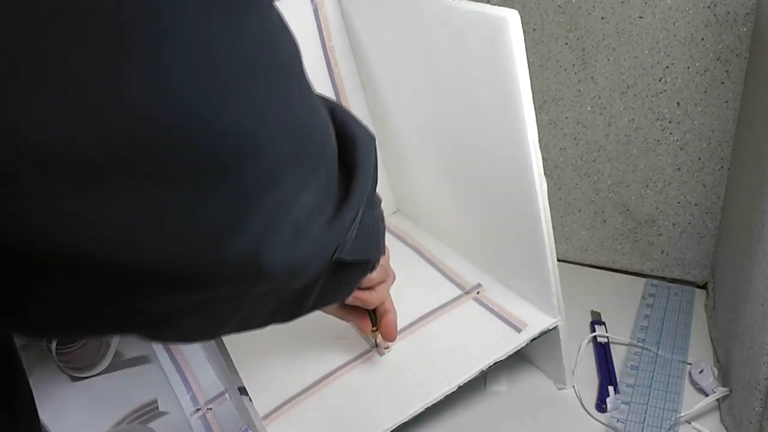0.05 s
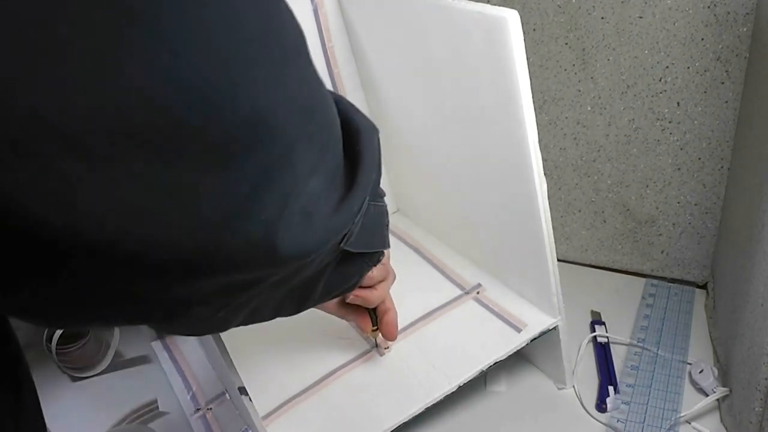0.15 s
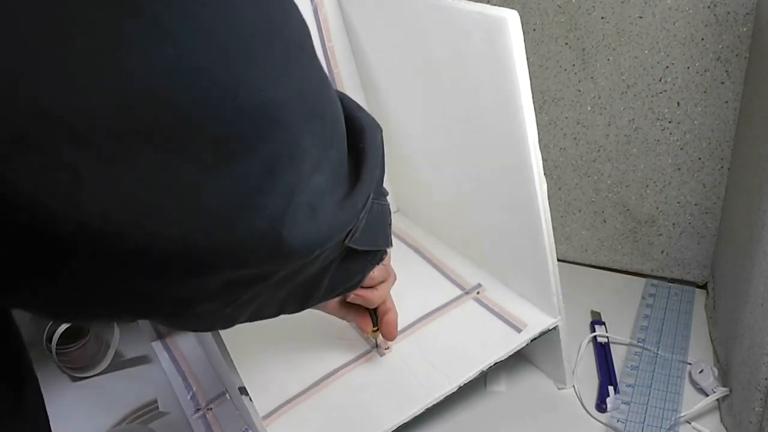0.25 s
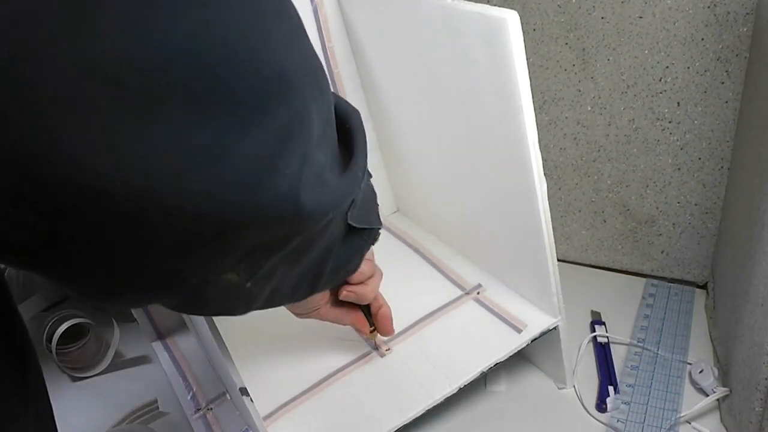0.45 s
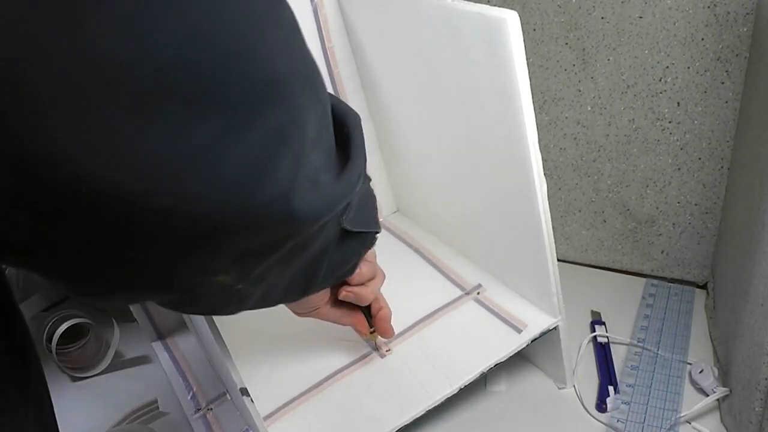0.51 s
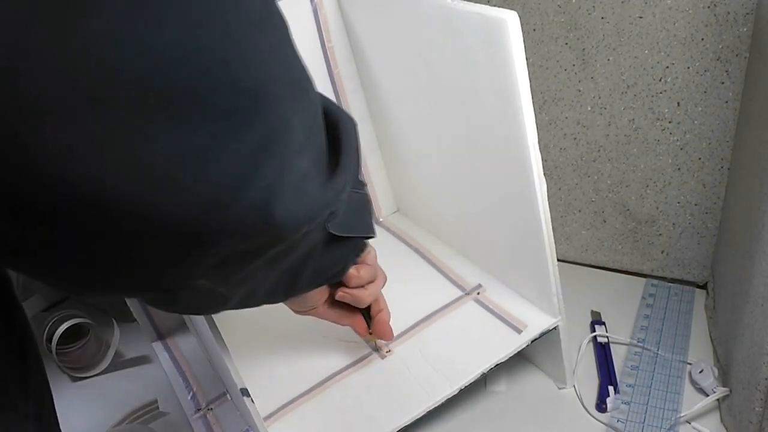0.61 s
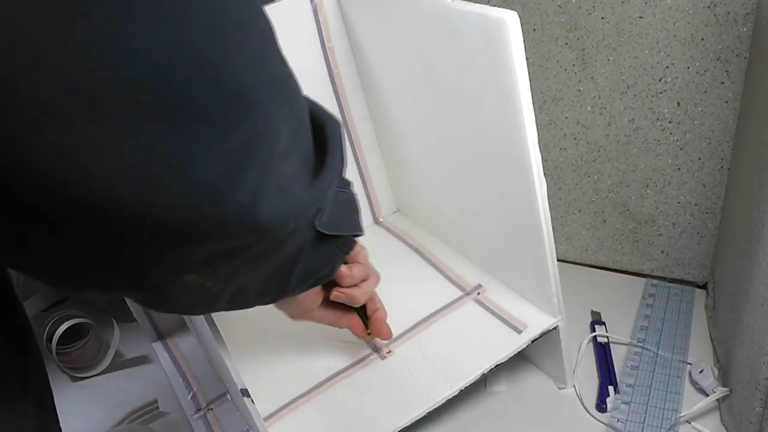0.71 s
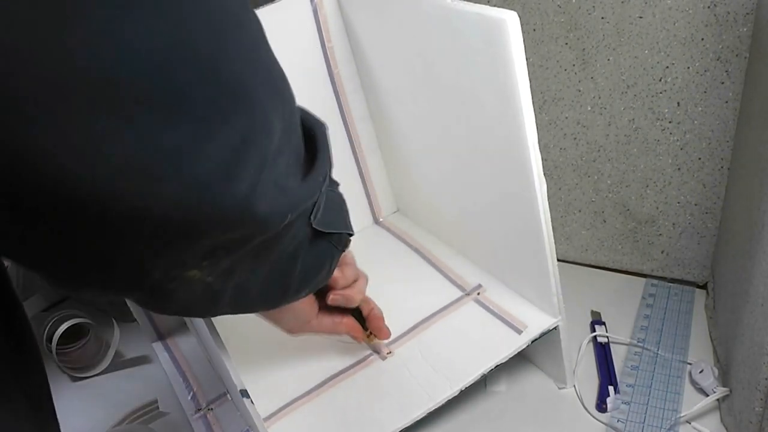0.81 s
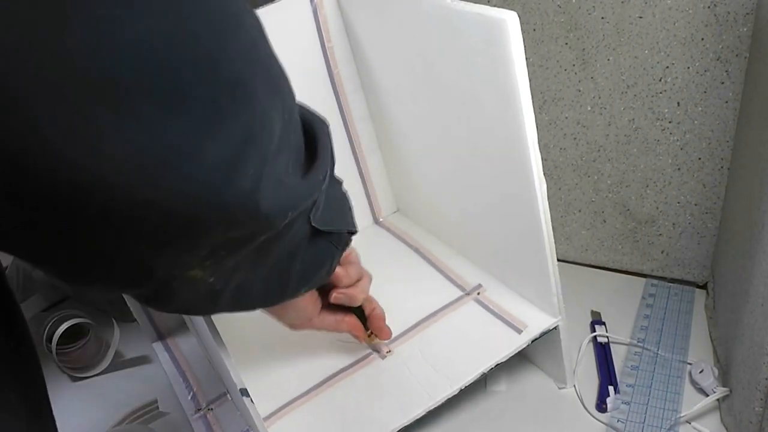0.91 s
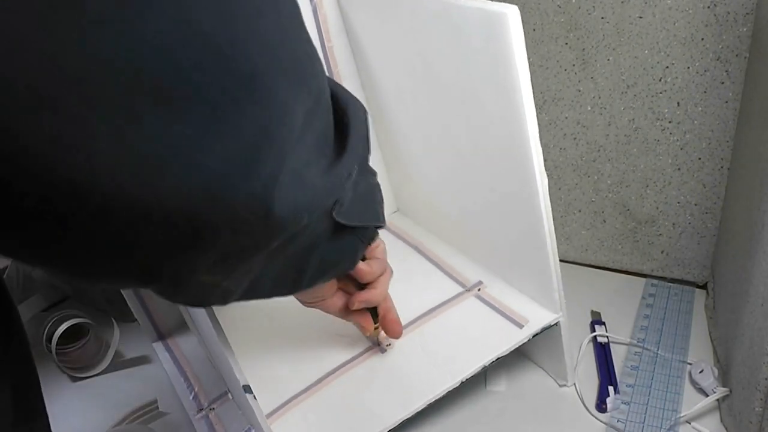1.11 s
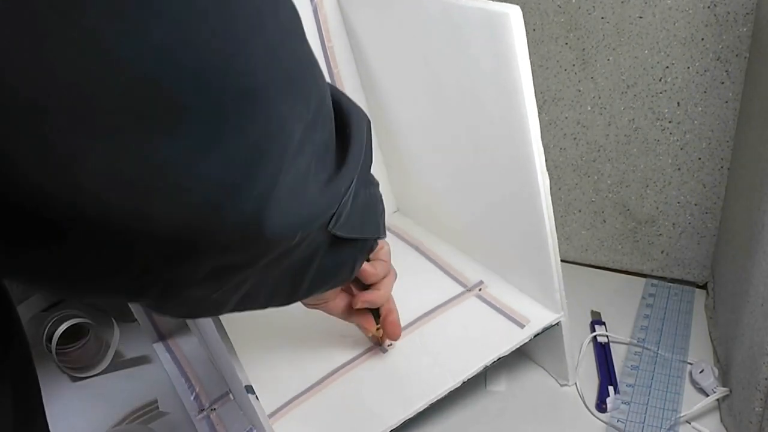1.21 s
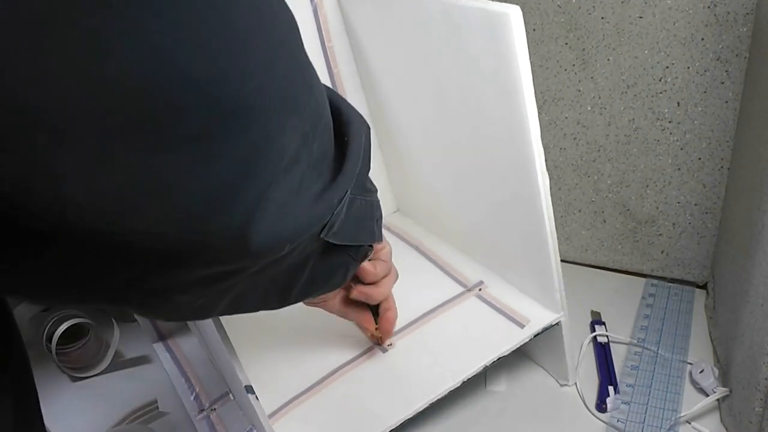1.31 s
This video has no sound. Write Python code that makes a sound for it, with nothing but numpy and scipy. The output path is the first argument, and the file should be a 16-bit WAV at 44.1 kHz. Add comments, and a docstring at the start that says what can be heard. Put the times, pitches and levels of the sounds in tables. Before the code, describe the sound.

A craft knife cuts a foam-core box on a table, close to the microphone: a juddering rasp, light bumps, a second stroke and sharp snap, then a slow pull ending in another snap, in a small hard room.

```python
"""A craft knife is drawn in short strokes through a foam-core box on a table, close to the microphone.
Hand and sleeve rub over a deep rumble as the first stroke rasps and judders, with brief chatters of the board.
Light bumps lead into a second stroke and a sharp snap at 0.36 s, where the blade breaks through.
A slow, deep pull with small pops and bumps ends in a second snap at 0.9 s, then a faint rasp eases off.
A small hard room rings after each sound; the loudest peaks overload."""
import sys
import numpy as np
from scipy import signal
from scipy.fft import rfft, irfft
from scipy.io import wavfile
from scipy.ndimage import uniform_filter1d

SR = 44100
rng = np.random.default_rng(int(sys.argv[2]) if len(sys.argv) > 2 else 0)


def persist_wave(psi):
    """Save psi, clipped to +-1, as 16-bit WAV."""
    counts = np.round(np.clip(psi, -1, 1) * 32767).astype(np.int16)
    wavfile.write(sys.argv[1], SR, np.atleast_2d(counts).T)


N = 59535  # samples, 1.35 s


def amp(db):
    """Decibels to gain."""
    return 10 ** (np.asarray(db) / 20)


def unit(x):
    """Scale to rms 1."""
    return x / np.sqrt(np.mean(x ** 2))


def curve(rows):
    """Gain over time from (seconds, dB) points; practically silent outside them."""
    seconds, db = np.array(rows).T
    return amp(np.interp(np.arange(N) / SR, seconds, db, left=-150, right=-150))


def colour(x, points):
    """Causal minimum-phase filter of unit power, shaped through (Hz, dB) points."""
    hz, db = np.array(points).T
    log_hz = np.log(np.fft.rfftfreq(2 * N, 1 / SR) + 1)
    gain = unit(amp(np.interp(log_hz, np.log(hz), db)))
    # fold the cepstrum forward in time so that nothing sounds early
    cepstrum = irfft(np.log(gain))
    cepstrum[1:N] *= 2
    cepstrum[N + 1:] = 0
    response = np.exp(rfft(cepstrum))
    return irfft(rfft(x, 2 * N) * response)[..., :N]


def stereo(mid, side=0, pan_db=0):
    """Left and right from mid and side; a positive pan leans left."""
    left = (mid + side) * amp(pan_db / 2)
    right = (mid - side) * amp(-pan_db / 2)
    return np.array([left, right])


def flutter(rate_hz, depth_db):
    """Smooth random unevenness of a gain."""
    size = max(int(SR / rate_hz), 1)
    smooth = uniform_filter1d(uniform_filter1d(rng.standard_normal(N), size), size)
    return amp(depth_db * unit(smooth))


def swell(at, length_s):
    """A smooth hump of height 1, its length taken between the 1/e points."""
    return np.exp(-(2 * (np.arange(N) / SR - at) / length_s) ** 2)


GRAINS_PER_S = 4600


def grains(spread_db):
    """Dense tiny clicks of random sign and uneven size, rms 1."""
    hit = rng.random(N) < GRAINS_PER_S / SR
    sign = rng.choice([-1, 1], N)
    size = amp(spread_db * np.clip(rng.standard_normal(N), -2, 2))
    return unit(hit * sign * size)


# Still air. Each row: frequency in Hz, relative density in dB per Hz.
AIR_SPECTRUM = [(25, -11), (60, -12.5), (110, -6.5), (400, 12.5), (1000, -4.5), (3000, -23.5),
                (15000, -31.5)]
AIR_DB = -55.5


def air():
    """Still air: steady, coloured noise with a little width."""
    mid, side = amp(AIR_DB) * colour(rng.standard_normal((2, N)), AIR_SPECTRUM)
    return stereo(mid, 0.22 * side, BOARD_PAN_DB)


# Dull rub of hand and sleeve on the box. Each row: time in seconds, level in dB.
RUB_LEVEL = [(0, -50), (.06, -46), (.13, -56), (.2, -61), (.29, -49), (.36, -30), (.42, -46), (.49, -54.5),
             (.56, -56), (.66, -53), (.74, -52.5), (.85, -52.5), (.95, -69.5), (1.1, -78), (1.35, -56)]
# Tone of that rub. Each row: frequency in Hz, relative density in dB per Hz.
RUB_SPECTRUM = [(25, -27), (60, -23), (100, -9.5), (170, 0), (220, 5.5), (320, -11), (700, -46),
                (2000, -54)]
# Deep rumble. Each row: time in seconds, level in dB.
RUMBLE_LEVEL = [(0, -55), (.25, -53), (.33, -59), (.39, -81), (.6, -76.5), (.66, -59.5), (.86, -57),
                (.95, -64.5), (1.15, -78.5), (1.3, -63), (1.35, -69)]
# Tone of the rumble. Each row: frequency in Hz, relative density in dB per Hz.
RUMBLE_SPECTRUM = [(15, -3.5), (35, -11), (58, -1.5), (90, 0.5), (160, -20), (600, -57.5)]
BOARD_PAN_DB = -1.5  # slightly right, for the board and all around it


def handling():
    """Hand and sleeve rub on the box, over a deep rumble: two layers of coloured noise."""
    rub_noise, rumble_noise = rng.standard_normal((2, N))
    rub = curve(RUB_LEVEL) * colour(rub_noise, RUB_SPECTRUM)
    rumble = curve(RUMBLE_LEVEL) * colour(rumble_noise, RUMBLE_SPECTRUM)
    return stereo(rub + rumble, pan_db=BOARD_PAN_DB)


# Drag of the blade that shakes the panel. Each row: time in seconds, level in dB.
DRAG_LEVEL = [(0, -54.5), (.028, -43), (.062, -37.5), (.09, -31.5), (.106, -54), (.205, -58.5),
              (.222, -31.5), (.238, -24.5), (.26, -38.5), (.3, -43.5), (.33, -36), (.36, -44.5), (.41, -89),
              (.535, -56), (.625, -51.5), (.638, -36.5), (.67, -50), (.75, -43.5), (.79, -54), (.88, -46),
              (.93, -48), (1.1, -68), (1.175, -52.5), (1.22, -80.5), (1.31, -59), (1.35, -65)]
# Tone of the shaken board. Each row: frequency in Hz, relative density in dB per Hz.
JUDDER_SPECTRUM = [(40, -56.5), (120, -30), (220, -11), (310, 0.5), (450, 2), (620, 0.5), (780, -6),
                   (1200, -5.5), (1750, -12), (2600, -26), (5000, -41)]


def judder():
    """The blade sticks and slips: uneven random clicks shake the board."""
    slips = curve(DRAG_LEVEL) * grains(spread_db=4)
    return stereo(colour(slips, JUDDER_SPECTRUM), pan_db=BOARD_PAN_DB)


# Pace of the knife, heard as the level of its rasp, in five passages in order of time.
# Each row: time in seconds, level in dB.
FIRST_STROKE = [(0, -61), (.014, -44.5), (.03, -36), (.058, -42), (.066, -53.5), (.088, -52.5), (.114, -62),
                (.205, -62.5)]
SECOND_STROKE = [(0.204, -66), (0.212, -45.5), (.226, -52), (.236, -37.5), (0.259, -52.5), (.3, -45),
                 (.326, -40), (.358, -52.5), (.37, -85)]
SLOW_PULL = [(.51, -71), (.56, -64.5), (.63, -55.5), (0.692, -53.5), (0.747, -50), (.78, -60.5),
             (.88, -60.5), (.9, -74.5)]
CUT_END = [(.68, -80), (.74, -67.5), (.79, -60), (.87, -62.5), (.894, -41.5), (.905, -78)]
EASING_OFF = [(1.0, -87), (1.051, -69.5), (1.096, -75.5), (1.124, -67.5), (1.184, -70), (1.222, -79.5),
              (1.28, -69.5), (1.35, -74.5)]
# Single foam cells popping. Each row: time in seconds, level before colouring in dB.
POPS = [(0.5627, -44.5), (.758, -49), (0.775, -51), (0.823, -43.5), (0.856, -48.5), (.981, -56),
        (1.149, -50), (1.181, -54.5), (1.193, -55.5), (1.286, -59)]
# Tone of the two quick strokes. Each row: frequency in Hz, relative density in dB per Hz.
QUICK_SPECTRUM = [(300, -22), (1500, 3.5), (2700, -9.5), (3150, -1.5), (3600, -5), (5700, -4.5), (6500, 2),
                  (7100, 1), (7600, 1.5), (8500, 1), (10500, -6.5), (12500, -9.5), (15500, -14.5)]
# The slow, deep pull sings in narrow bands. Each row: frequency in Hz, relative density in dB per Hz.
SLOW_SPECTRUM = [(300, -18.5), (1800, 4.5), (2900, -9), (3400, -5), (3800, 1.5), (4200, -5), (4700, -8),
                 (5300, 2.5), (5800, -16.5), (6400, 2), (6800, -6), (7150, 2.5), (7500, -2.5), (8800, -5.5),
                 (10500, -11), (15500, -19.5)]
# Thin and gritty near the end of the cut. Each row: frequency in Hz, relative density in dB per Hz.
THIN_SPECTRUM = [(300, -14), (3000, -8.5), (5500, -6.5), (7500, -1), (10000, -3.5), (13000, -6.5),
                 (15500, -6)]
# Stereo width of the rasp. Each row: frequency in Hz, relative gain of the side signal in dB.
RASP_WIDTH = [(1500, -0.5), (4000, -1.5), (8000, -3.5), (11500, 6), (16000, -12)]
RASP_SIDE, RASP_PAN_DB = 0.45, 1
POP_S = 0.00041


def rasp():
    """Foam cells tear at the blade's edge as dense clicks, a few popping on their own."""
    quick = (curve(FIRST_STROKE) + curve(SECOND_STROKE)) * flutter(rate_hz=300, depth_db=0.4)
    slow = curve(SLOW_PULL)
    thin = (curve(CUT_END) + curve(EASING_OFF)) * flutter(rate_hz=320, depth_db=3.0)
    pops = sum(amp(db) * swell(at, POP_S) for at, db in POPS)

    def tearing():
        """One independent layer of torn cells under the shared pace."""
        quick_tear = colour(quick * grains(spread_db=0), QUICK_SPECTRUM)
        slow_tear = colour(slow * grains(spread_db=2.5), SLOW_SPECTRUM)
        thin_cells = thin * grains(spread_db=-3.5) + pops * rng.standard_normal(N)
        return quick_tear + slow_tear + colour(thin_cells, THIN_SPECTRUM)

    mid, side = tearing(), tearing()
    return stereo(mid, RASP_SIDE * colour(side, RASP_WIDTH), RASP_PAN_DB)


# Short chatters of the blade. Each row: centre in seconds, length in seconds, typical slip rate in Hz,
# level in dB.
CHATTERS = [(0.032, 0.027, 445, -30.5), (0.037, 0.037, 625, -33.5), (0.086, 0.11, 437, -43.5)]


def chatter(wander_db=-0.22):
    """For a moment the blade slips regularly and the board gives a wavering note."""
    notes = 0
    for at, length_s, slip_hz, db in CHATTERS:
        wavering_hz = slip_hz * flutter(rate_hz=440, depth_db=wander_db)  # about 2.6 % either way
        tone = np.sin(2 * np.pi * np.cumsum(wavering_hz) / SR)
        notes = notes + amp(db) * swell(at, length_s) * tone
    return stereo(notes, pan_db=BOARD_PAN_DB)


def contact(at, length_s):
    """A brief push of area 1; the longer it lasts, the less treble it excites."""
    force = swell(at, length_s)
    return force / force.sum()


def ring(force, modes):
    """Damped modes, each a decaying cosine, ring to a force."""
    t = np.arange(N // 2) / SR
    response = 0
    for hz, db, t60 in modes:
        response = response + amp(db) * np.cos(2 * np.pi * hz * t) * np.exp(-np.log(1000) * t / t60)
    return signal.fftconvolve(force, response)[:N]


SWING_GLIDE_S, SWING_RISE_S, SWING_HOLD_S = 0.0013, 0.0004, 0.0054


def swing(at, start_hz, end_hz):
    """A bending wave crosses the board: its highs arrive first, then a few slow cycles."""
    t = np.maximum(np.arange(N) / SR - at, 0)
    glide = (start_hz - end_hz) * SWING_GLIDE_S * (1 - np.exp(-t / SWING_GLIDE_S))
    turns = end_hz * t + glide
    envelope = (1 - np.exp(-t / SWING_RISE_S)) * np.exp(-(t / SWING_HOLD_S) ** 3)
    return np.sin(2 * np.pi * turns) * envelope


# Modes of the box panel. Each row: frequency in Hz, relative level in dB, time to fall 60 dB in seconds.
PANEL_MODES = [(214.2, -42, 0.26), (282.3, -29, 0.24), (312.2, -21, 0.14), (364, -28.5, 0.24),
               (429, -20.5, 0.074), (495, -57.5, 0.16), (563.4, -25, 0.082), (622, -21.5, .07),
               (689.4, -27.5, 0.12), (794, -19.5, 0.05), (886.5, -15.5, 0.064), (968, -25.5, .09),
               (1182, -20, 0.027), (1358, -13.5, 0.025), (1631, -15, 0.056)]
# Soft bumps of blade and hand on the board. Each row: time in seconds, panel ring in dB,
# contact length in seconds, final swing frequency in Hz, swing level in dB.
BUMPS = [(0.2268, -19, 0.001, 344, -28), (0.233, -18.5, 0.0021, 323, -23),
         (0.2379, -14.5, 0.00061, 585, -26.5), (0.2418, -10.5, 0.001, 307, -20.5),
         (0.5318, -23, .0008, 405, -44), (0.6342, -19.5, 0.00028, 372, -28.5),
         (1.2862, -23, 0.00094, 301, -37.5)]
BUMP_GLIDE = 1.61  # the swing starts this many times higher


def bumps():
    """Soft contacts swing the board and ring its panel, the longer ones mostly its lower modes."""
    force = swings = 0
    for at, ring_db, contact_s, swing_hz, swing_db in BUMPS:
        force = force + amp(ring_db) * contact(at, contact_s)
        swings = swings + amp(swing_db) * swing(at, BUMP_GLIDE * swing_hz, swing_hz)
    return stereo(ring(force, PANEL_MODES) + swings, pan_db=BOARD_PAN_DB)


BOX_ECHO_DB, BOX_ECHO_T60_S = -15, 0.014


def box_echo(x):
    """Sound scatters briefly between the walls of the box: a short decaying noise tail."""
    t = np.arange(N // 8) / SR
    scatter = rng.standard_normal(len(t)) * np.exp(-np.log(1000) * t / BOX_ECHO_T60_S)
    echo = signal.fftconvolve(x, scatter / np.linalg.norm(scatter))[:N]
    return x + amp(BOX_ECHO_DB) * echo


# Snaps of the blade breaking through. Each row: time in seconds, panel ring in dB, blade ring in dB,
# blade contact in seconds, crack level in dB, crack length in seconds, flex level in dB,
# swing lag in seconds, swing start in Hz, swing end in Hz, swing level in dB.
SNAPS = [(0.3604, 3.5, 7, 0.00011, -9, 0.0014, -28, 0.00019, 472, 418, -4),
         (0.8976, 6.5, -7.5, 0.000055, -6, 0.0021, -3, 0, 1077, 395, -2.5)]
# Brief ring of blade and paper skin. Each row: frequency in Hz, relative level in dB,
# time to fall 60 dB in seconds.
BLADE_MODES = [(1353, -18, 0.026), (2164, -14.5, 0.012), (3370, -24.5, 0.0055), (3990, -28.5, 0.0069),
               (7060, -29.5, 0.0057), (8050, -8, .004), (10930, -34.5, 0.0024)]
# Tone of the cracking skin. Each row: frequency in Hz, relative density in dB per Hz.
CRACK_SPECTRUM = [(200, -3), (800, 23.5), (1400, -4), (2200, 17), (2750, -2), (3500, -2), (5400, -17.5),
                  (6900, 9.5), (8000, -11), (12000, -6), (16000, -16)]
SNAP_CONTACT_S, FLEX_S, CRACK_SIDE = 0.00053, 0.00066, 0.15
FLEX_LEAD_S, BLADE_LEAD_S, CRACK_LEAD_S = 0.00051, 0.0001746, 0.0001  # ahead of the snap


def snaps():
    """The board flexes, its paper skin cracks, and blade and board spring back ringing."""
    board = tear = blade_force = 0
    for (at, ring_db, blade_db, blade_s, crack_db, crack_s, flex_db,
         lag_s, start_hz, end_hz, swing_db) in SNAPS:
        board = board + amp(ring_db) * ring(contact(at, SNAP_CONTACT_S), PANEL_MODES)
        board = board + amp(swing_db) * swing(at + lag_s, start_hz, end_hz)
        board = board - amp(flex_db) * swell(at - FLEX_LEAD_S, FLEX_S)
        blade_force = blade_force + amp(blade_db) * contact(at - BLADE_LEAD_S, blade_s)
        tear = tear + amp(crack_db) * swell(at - CRACK_LEAD_S, crack_s)
    crack_mid, crack_side = colour(tear * rng.choice([-1, 1], (2, N)), CRACK_SPECTRUM)
    sharp = box_echo(crack_mid - ring(blade_force, BLADE_MODES))
    return stereo(board + sharp, CRACK_SIDE * crack_side, BOARD_PAN_DB)


# Bands of the small hard room. Each row: centre in Hz, echo level in dB, time to fall 60 dB in seconds.
ROOM_BANDS = [(76.2, -42.5, 0.46), (186, -11, 0.31), (313, -13, 0.3), (560, -13, 0.41), (1010, -16.5, 0.43),
              (2000, -26, 0.29), (4170, -18, 0.24), (8040, -43.5, 0.11), (14600, -42, 0.098)]
ROOM_DELAY_S, ROOM_RISE_S, ROOM_SIDE = 0.0027, 0.0013, 0.31


def room(dry):
    """Dense echoes from near walls: noise in bands, each fading at its own pace, the treble soonest."""
    t = np.arange(N // 2) / SR
    log_hz = np.log(np.fft.rfftfreq(len(t), 1 / SR) + 1)
    noise = rfft(rng.standard_normal((2, len(t))))
    log_centres = np.log([row[0] for row in ROOM_BANDS])
    onset = np.clip((t - ROOM_DELAY_S) / ROOM_RISE_S, 0, 1)
    tail = 0
    # each share is 1 at its own centre and 0 at the others, so neighbours cross-fade
    for share, (_, db, t60) in zip(np.eye(len(ROOM_BANDS)), ROOM_BANDS):
        band = irfft(noise * np.interp(log_hz, log_centres, share), len(t))
        fade = np.exp(-np.log(1000) * t / t60) * onset
        tail = tail + amp(db) * band * fade / np.sqrt(np.sum(fade ** 2))
    echoes = stereo(tail[0], ROOM_SIDE * tail[1])
    return signal.fftconvolve(dry, echoes, axes=1)[:, :N]


def scene():
    """Knife and box in the room, over still air."""
    dry = snaps() + bumps() + rasp() + judder() + chatter() + handling()
    return air() + dry + room(dry)


CEILING, TOP_HZ = 0.61, 15600  # full-scale fraction, cutoff


def record(dry):
    """The recorder flattens the loudest peaks and cuts the top with a steep low-pass."""
    rounded = dry / (1 + (dry / CEILING) ** 4) ** (1 / 4)
    low_pass = signal.ellip(8, 0.2, 70, TOP_HZ, fs=SR, output="sos")  # order, ripple dB, stop dB
    return signal.sosfilt(low_pass, rounded)


dry = scene()
out = record(dry)
persist_wave(out)
```